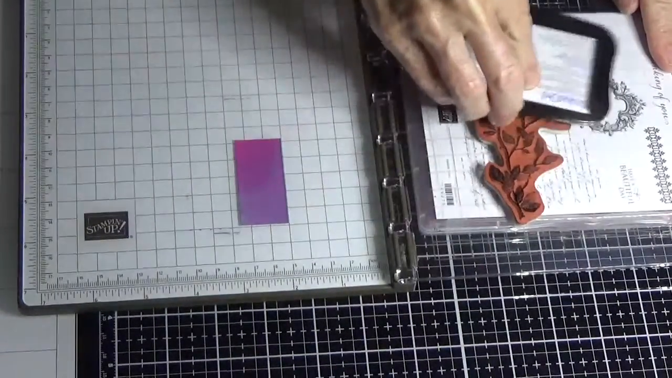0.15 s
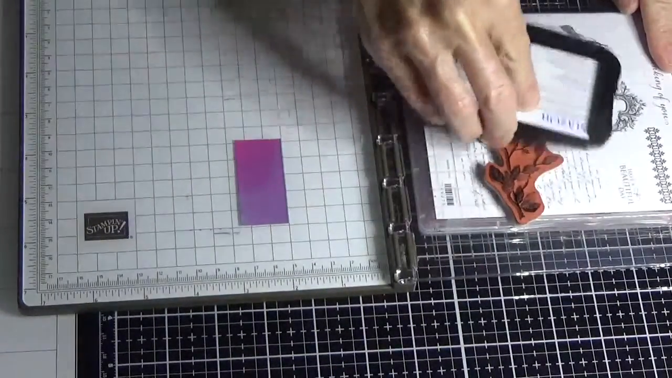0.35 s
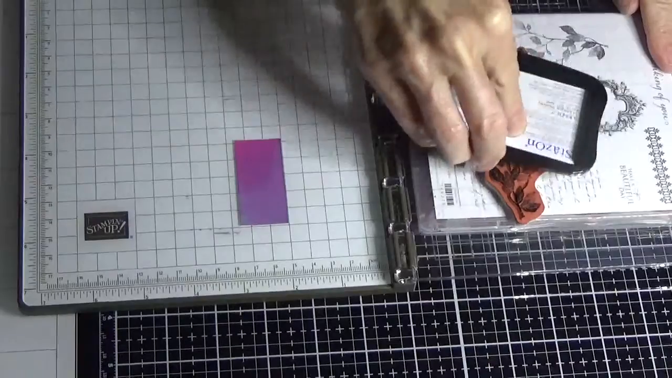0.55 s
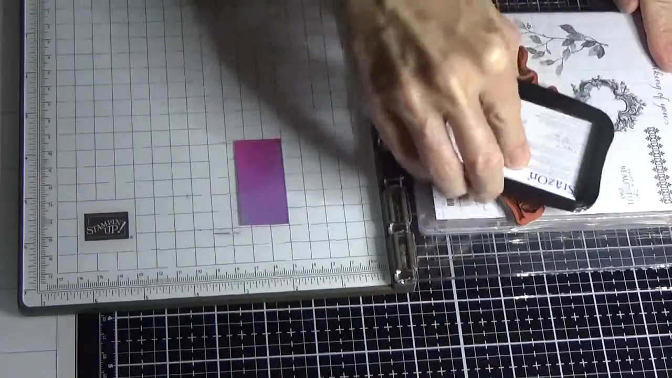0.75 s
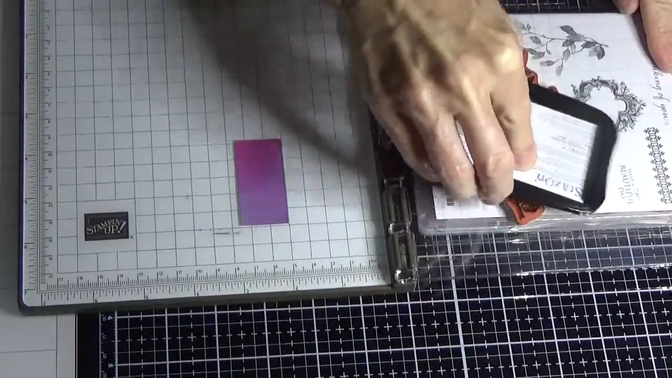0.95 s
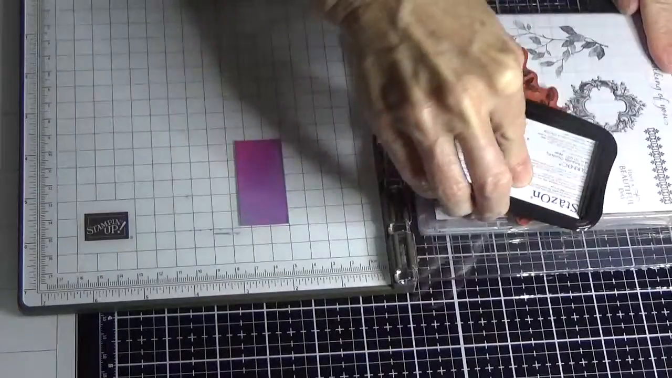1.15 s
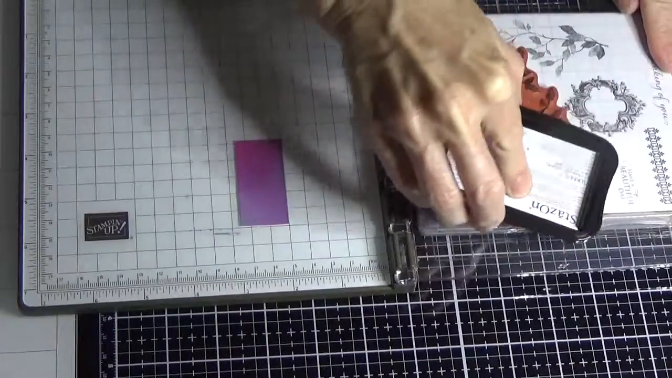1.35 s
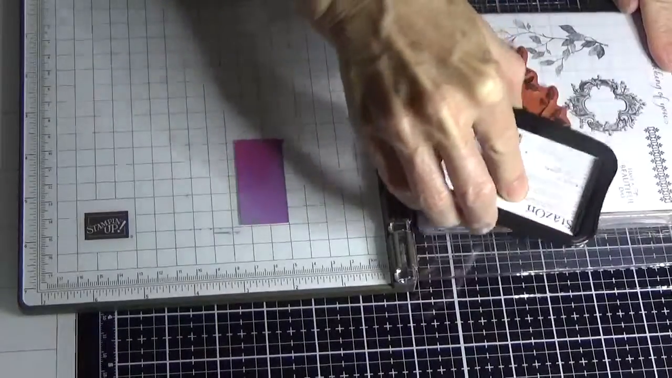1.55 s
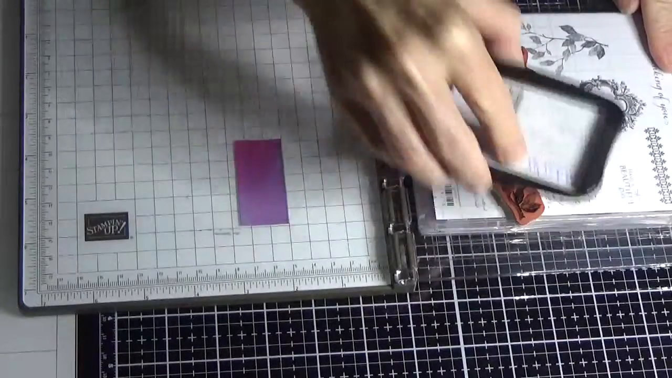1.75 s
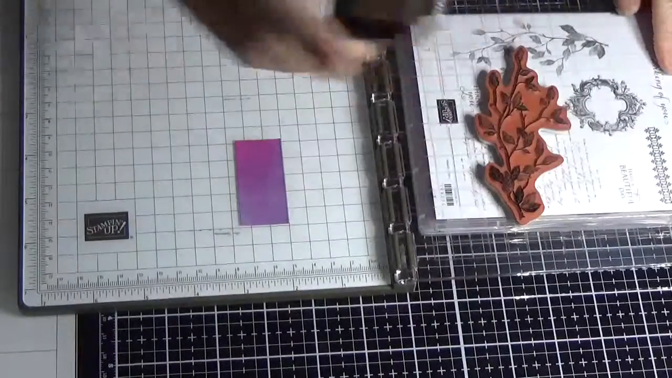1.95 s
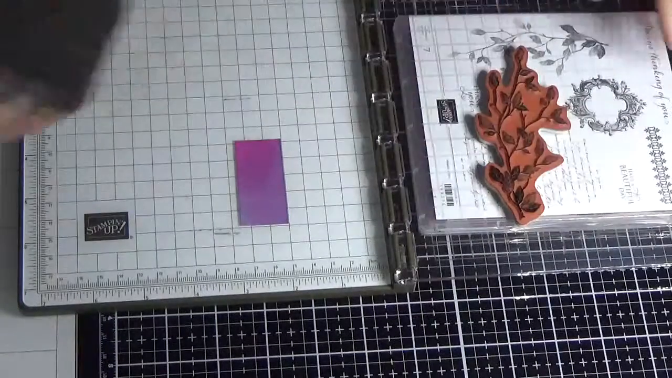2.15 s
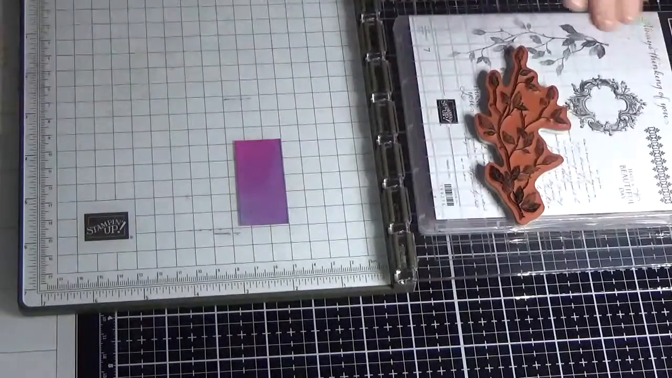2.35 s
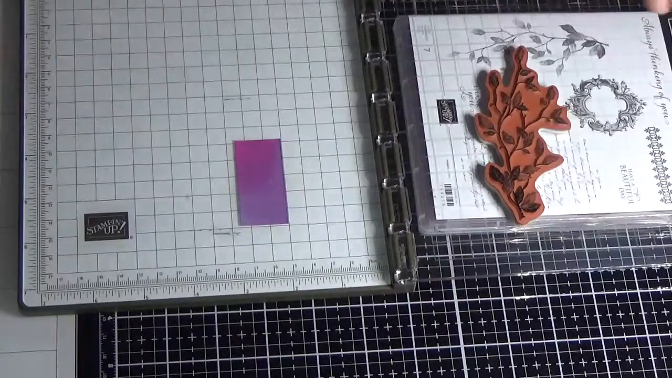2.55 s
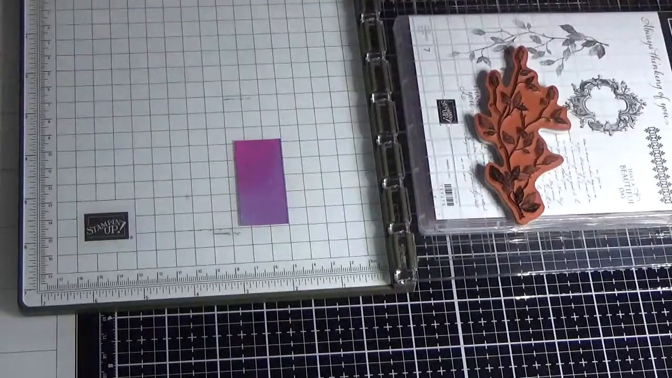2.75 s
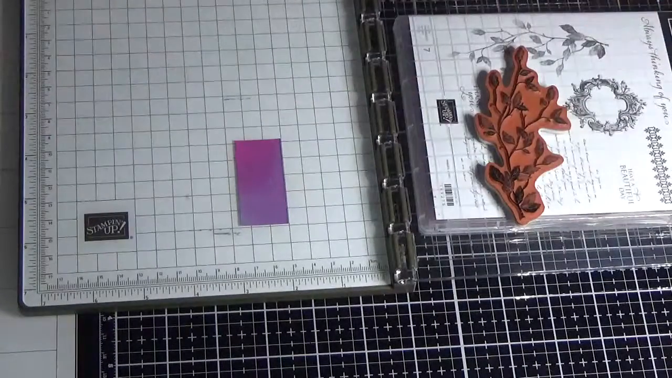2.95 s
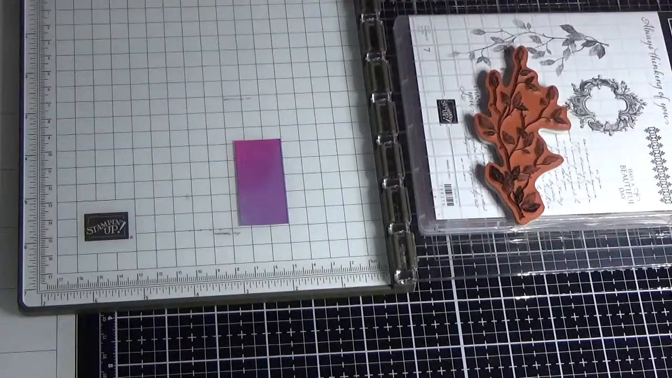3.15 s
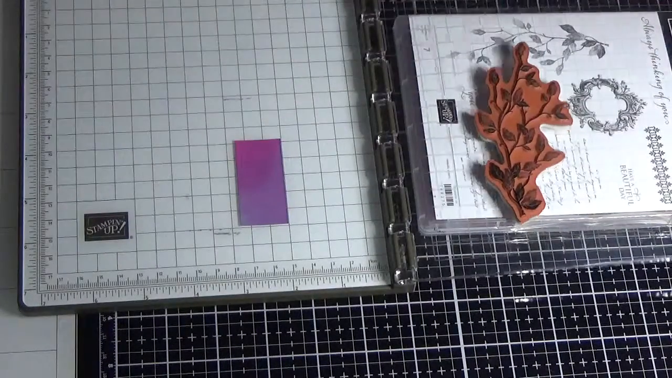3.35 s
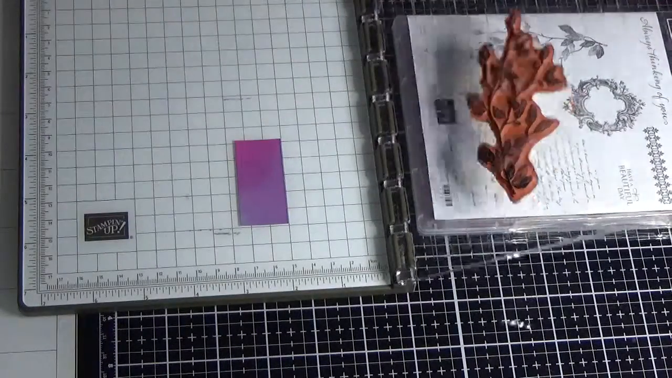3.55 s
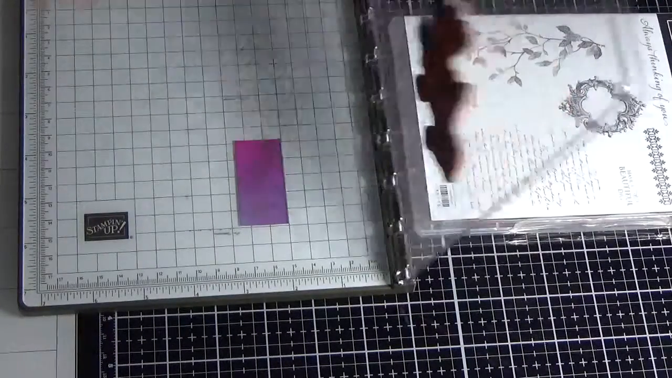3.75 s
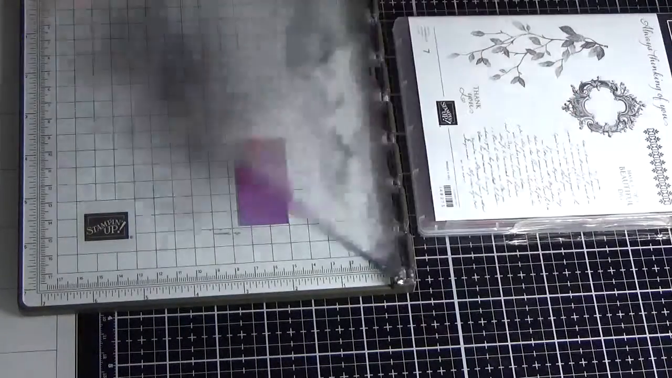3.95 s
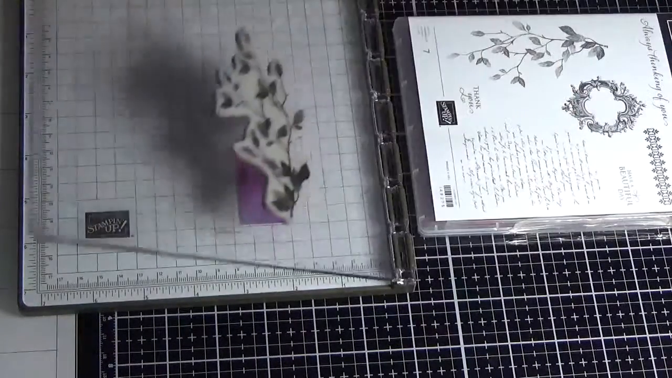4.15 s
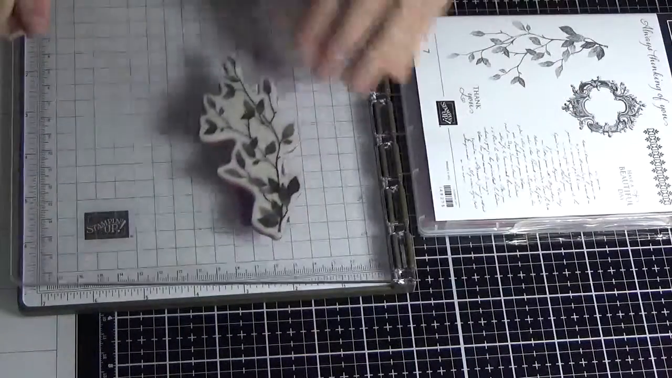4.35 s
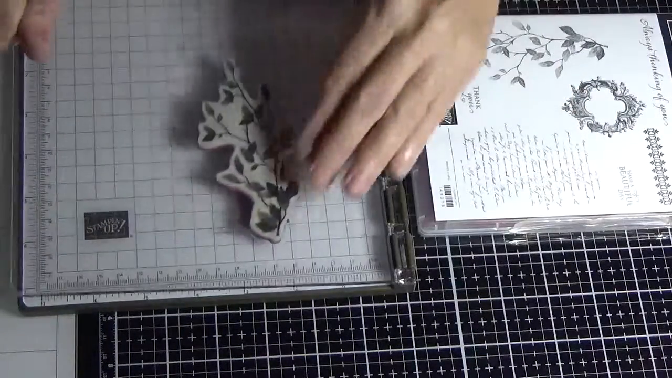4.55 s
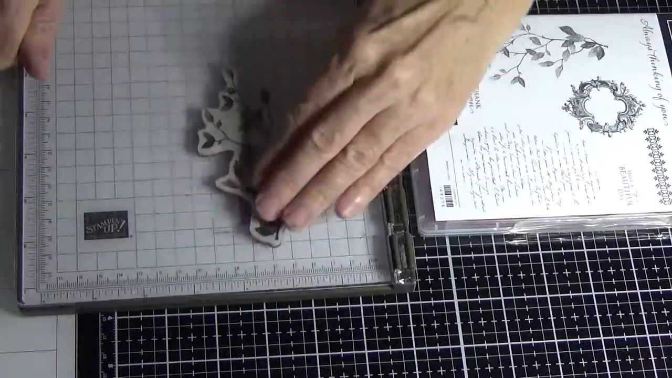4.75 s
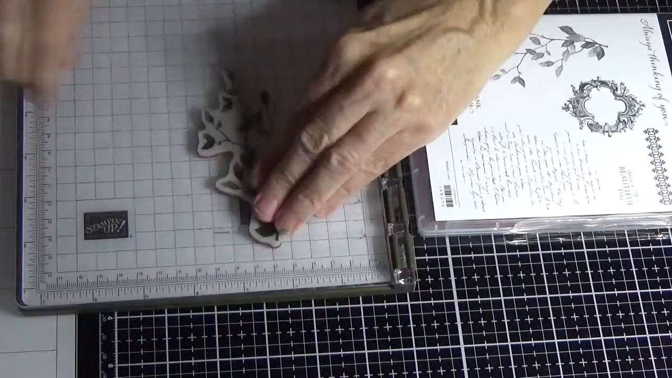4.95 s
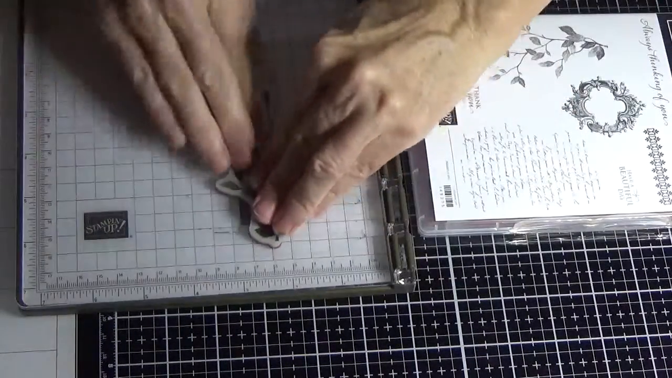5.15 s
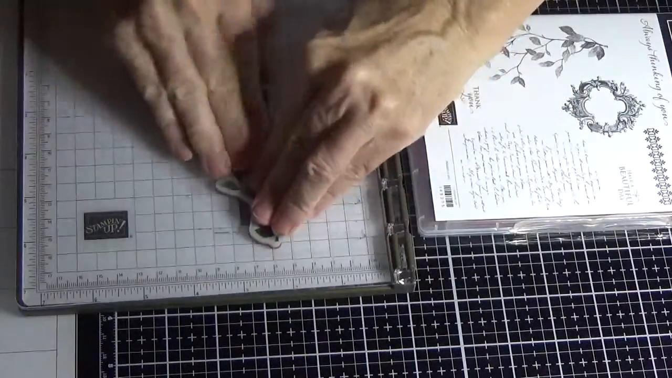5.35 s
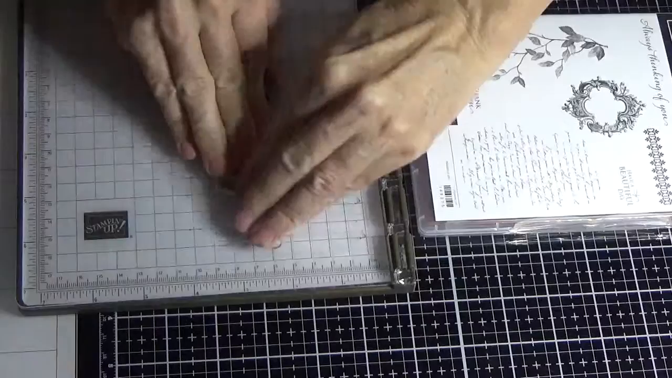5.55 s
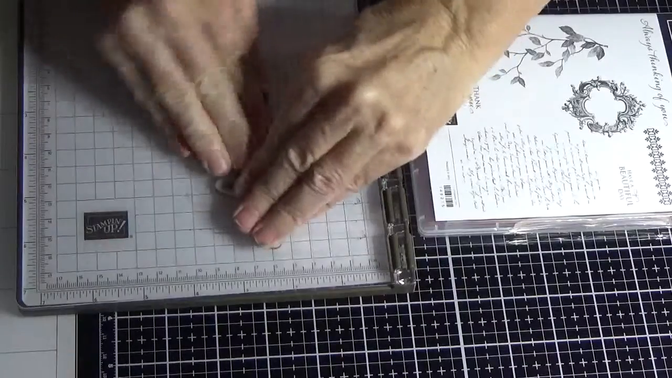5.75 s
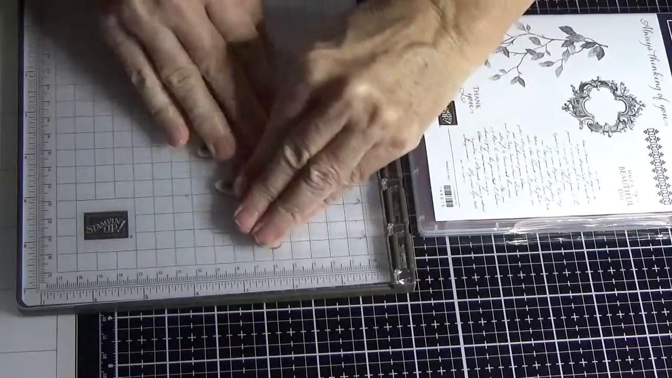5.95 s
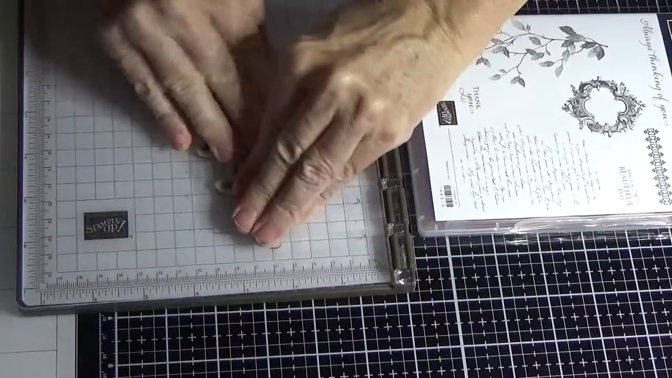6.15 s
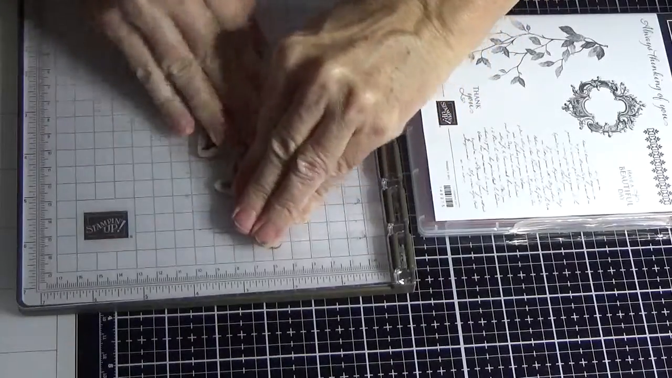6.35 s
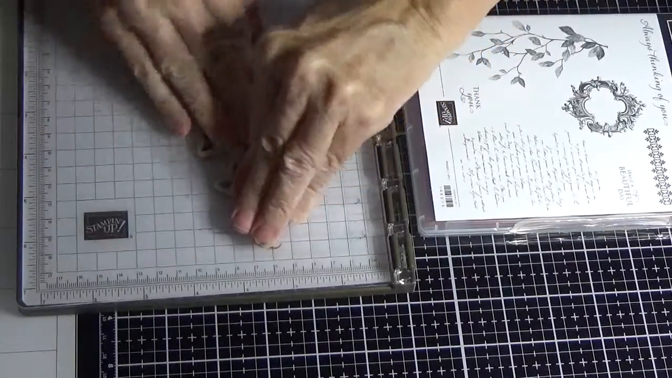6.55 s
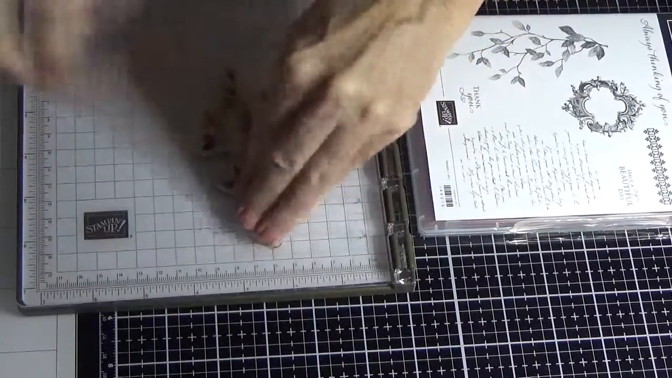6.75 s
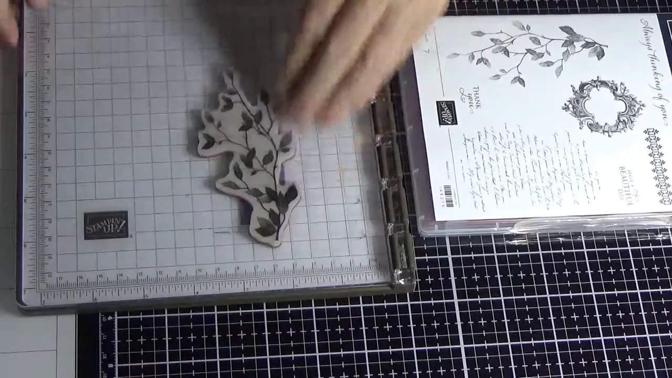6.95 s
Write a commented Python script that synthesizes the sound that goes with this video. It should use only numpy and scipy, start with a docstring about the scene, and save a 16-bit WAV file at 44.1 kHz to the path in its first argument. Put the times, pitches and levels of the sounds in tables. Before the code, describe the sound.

A quick, steady run of soft thuds opens as an ink pad pats a rubber stamp on a desk. Next comes a sharp plastic clatter, ending in the loudest sound, the snap of the pad's lid. Irregular knocks and tacky ticks follow from an acrylic plate being closed and pressed by fingers. The stereo microphone is close, the room small, with a faint hiss throughout.

```python
"""Inking a stamp at a desk

A small room, a stereo microphone close to the desk. An ink pad is tapped again and again on a rubber
stamp lying on a stamping platform. The pad is set aside; its plastic lid clatters on with a loud snap
that washes through the room. The platform's hinged acrylic plate is swung over and pressed, knocking and
ticking under the fingers. Each blow also thuds through the desk. The recorder hisses and ticks faintly."""
import sys
import numpy as np
from scipy import signal
from scipy.fft import rfft, irfft
from scipy.io import wavfile

SR = 44100
rng = np.random.default_rng(int(sys.argv[2]) if len(sys.argv) > 2 else 0)


def master_out(mix):
    """Clip the mix to full scale and print it as 16-bit PCM to the path in sys.argv[1]."""
    frames = np.transpose(np.atleast_2d(mix))
    ceiling = np.clip(frames, -1, 1)
    pcm = np.round(ceiling * 32767).astype(np.int16)
    wavfile.write(sys.argv[1], SR, pcm)


N = 308126
SIZE = 2 ** 15   # samples in one event or room tail
AGE = np.arange(SIZE) / SR
CUTOFF_HZ = 11120   # top of the recorder's range


def amp(db):
    """Decibels to gain."""
    return 10 ** (np.asarray(db) / 20)


def coloured(x, spectrum):
    """Causal (minimum-phase) filter through points of f/Hz, level/dB on a log-frequency axis."""
    hz, db = np.transpose(spectrum)
    log_bins = np.log(np.maximum(np.fft.rfftfreq(SIZE, 1 / SR), 1))
    cepstrum = irfft(np.log(amp(np.interp(log_bins, np.log(hz), db))))
    folded = np.r_[cepstrum[0], 2 * cepstrum[1:SIZE // 2]]
    return signal.fftconvolve(x, irfft(np.exp(rfft(folded, SIZE))))[:len(x)]


def butter(x, hz, kind, order=2):
    """Butterworth filter."""
    sections = signal.butter(order, np.minimum(hz, SR / 2 - 1), kind, fs=SR, output="sos")
    return signal.sosfilt(sections, x + 1e-18)


def resonance(x, hz, t60):
    """One mode, gain 1 at its peak, falling 60 dB in t60 seconds."""
    radius = 1000 ** (-1 / (t60 * SR))
    feedback = [1, -2 * radius * np.cos(2 * np.pi * hz / SR), radius ** 2]
    return signal.lfilter(np.array([1, 0, -1]) * (1 - radius ** 2) / 2, feedback, x + 1e-18)


def dying(t60):
    """Envelope of unit energy that falls 60 dB in t60 seconds."""
    shape = np.exp(-np.log(1000) * AGE / t60)
    return shape / np.linalg.norm(shape)


def click(blur_db, blur_t60):
    """An impulse followed by the blur of many crowded, short-lived modes; about unit energy."""
    blur = amp(blur_db) * dying(blur_t60) * rng.standard_normal(SIZE)
    return (signal.unit_impulse(SIZE) + blur) / np.hypot(1, amp(blur_db))


def add(track, s, sound):
    """Lay a sound into a track at s seconds."""
    start = round(s * SR)
    first, last = max(start, 0), min(start + len(sound), N)
    track[first:last] += sound[first - start:last - start]


def stereo(mid, side):
    """Left and right from mid and side."""
    return np.array([mid + side, mid - side])


# Decay of the small room: f/Hz, t60/s
ROOM_DECAY = [(100, 0.35), (500, 0.41), (1000, 0.35), (2500, 0.32), (5000, 0.32), (11000, 0.27)]
def room_tail(build_s):
    """Diffuse reflections build up, then die band by band; the deep bass hardly reverberates."""
    log_bins = np.log(np.fft.rfftfreq(SIZE, 1 / SR) + 1)
    noise = rfft(rng.standard_normal(SIZE))
    centres = np.log([hz for hz, t60 in ROOM_DECAY])
    bands = [irfft(noise * np.interp(log_bins, centres, share)) for share in np.eye(len(centres))]
    tail = sum(band * dying(t60) for band, (hz, t60) in zip(bands, ROOM_DECAY))
    return butter(tail * (1 - np.exp(-(AGE / build_s) ** 2)), 92, "high")


# Colour of the room's side signal at the microphone: f/Hz, level/dB
ROOM_SIDE = [(60, -29), (110, -41), (190, -35), (350, -13.5), (620, -12.5), (1120, -8.5), (2000, -8),
             (3600, -9), (6460, -6.5), (11600, -11)]
def at_microphone(x, room_db, pan_db, build_s):
    """Direct sound (positive pan is left) plus the room, which widens towards the treble."""
    tail = stereo(room_tail(build_s), amp(2) * coloured(room_tail(build_s), ROOM_SIDE))
    direct = x * amp([[pan_db / 2], [-pan_db / 2]])
    return direct + amp(room_db) * signal.fftconvolve(x[None], tail, axes=1)[:, :N]


# Colour of the room's rumble and the recorder's hiss: f/Hz, level/dB
HISS_COLOUR = [(15, -6), (25, -0.5), (48, 5), (87, 1), (124, 2), (160, 2), (192, -1.5), (372, -4),
               (480, -5.5), (668, -4.5), (1260, -8.5), (1590, -6.5), (1710, -8), (3500, -12),
               (11000, -17.5), (14300, -125), (22000, -120)]
# Their stereo width, side against mid: f/Hz, level/dB
HISS_SIDE = [(60, -26), (110, -15.5), (190, -10), (350, -3), (620, -2.5), (1120, 0), (2000, -1.5),
             (3600, -5), (6460, -7.5), (11600, -10)]
# Faint machine whine in the room: f/Hz, level/dB
WHINE_TONES = [(1416, -80), (1545, -78.5), (3424, -82)]
def background(hiss_db=-62.5, first_tick_s=0.0305, tick_period_s=0.08):
    """Room rumble and hiss, a thin whine, and the recorder's faint regular tick."""
    mid, side = (coloured(rng.standard_normal(N), HISS_COLOUR) for _ in range(2))
    mid_rms = butter(mid, CUTOFF_HZ, "low", order=8).std()
    hiss = amp(hiss_db) * stereo(mid, coloured(side, HISS_SIDE)) / mid_rms
    tones = [resonance(rng.standard_normal(N), hz, t60=0.33) for hz, db in WHINE_TONES]
    whine = sum(amp(db) * tone / tone.std() for tone, (hz, db) in zip(tones, WHINE_TONES))
    pulses = np.zeros(N)
    pulses[round(first_tick_s * SR)::round(tick_period_s * SR)] = amp(-26)
    return hiss + whine + butter(pulses, [3200, 3750], "band")


# Fingers and hinge rubbing, just right of centre: middle t/s, length/s, level/dB, f/Hz
RUB_STROKES = [(2.049, 0.1, -64.5, 8700), (2.373, 0.16, -67, 8800), (2.901, 0.28, -64.5, 8260),
               (3.52, 0.09, -57, 810), (3.961, 0.12, -61.5, 990), (4.242, 0.17, -63.5, 850),
               (6.347, 0.17, -62, 660), (6.51, 0.1, -55.5, 730), (6.757, 0.17, -62, 610),
               (6.915, 0.086, -58, 780)]
def rubs(band_ratio=1.59, grain_db=3, crackles_per_s=160, crackle_db=14):
    """Grainy friction swells and fades with each stroke, with a crackle of sticking and letting go."""
    out = np.zeros(N)
    for s, length, db, hz in RUB_STROKES:
        stroke = np.hanning(int(length * SR))
        noise = rng.standard_normal(SIZE)
        grain = amp(grain_db * np.repeat(rng.standard_normal(SIZE // 128), 128))
        friction = butter(noise * grain, [hz / band_ratio, hz * band_ratio], "band")
        snaps = (rng.random(SIZE) < crackles_per_s / SR) * rng.standard_normal(SIZE)
        crackle = signal.fftconvolve(snaps, click(blur_db=9, blur_t60=0.011))[:SIZE]
        sound = friction / friction.std() + amp(crackle_db) * butter(crackle, 2200, "high")
        add(out, s - length / 2, amp(db) * stroke * sound[:len(stroke)])
    return at_microphone(out, room_db=-3.5, pan_db=-1.5, build_s=0.014)


# Small snaps at the platform, near centre: t/s, level/dB, f/Hz
TACKY_SNAPS = [(1.75, -26, 6600), (4.668, -27, 7660), (4.86, -15, 3070), (4.916, -16, 2520),
               (5.348, -11, 3780), (6.832, -13.5, 2900)]
def ticks(band_ratio=1.143):
    """Tacky rubber and plastic let go; each snap rings for an instant around one pitch."""
    out = np.zeros(N)
    for s, db, hz in TACKY_SNAPS:
        snap = click(blur_db=-8, blur_t60=0.063)
        add(out, s, amp(db) * butter(snap, [hz / band_ratio, hz * band_ratio], "band", order=1))
    return at_microphone(out, room_db=-4, pan_db=0.5, build_s=0.0011)


# Modes of the desk with the platform on it: f/Hz, t60/s, level/dB
DESK_RING = [(61.2, 0.11, 12.5), (132.5, 0.081, 10.5), (194, 0.071, 10.5), (242.7, 0.11, 4.5),
             (319.8, 0.11, 4.5), (446, 0.13, 10.5), (570, 0.14, 8), (704, 0.065, 14), (1131, 0.12, 6)]
# Colour of the desk's crowded modes: f/Hz, level/dB
THUD_COLOUR = [(30, -25), (60, -9), (150, 6), (280, 4), (600, 7.5), (1200, -3.5), (4000, -20), (11000, -34)]
def thud(contact_hz, swell_lag_s=0.00598):
    """A soft push thuds through the desk; its deep notes swell up a moment after the push."""
    push = butter(signal.unit_impulse(SIZE), contact_hz, "low")
    late_push = np.interp(AGE - swell_lag_s, AGE, push, left=0)
    swell = sum(amp(db + rng.normal()) * resonance(resonance(late_push, hz, t60), hz, t60)
                for hz, t60, db in DESK_RING)
    blur = butter(click(blur_db=3, blur_t60=0.15), contact_hz, "low")
    return swell + coloured(blur, THUD_COLOUR)


def desk_pushes(hits, push_db, push_hz, delay_s=0.004, mid_body_hz=250, loss_db_per_octave=5.5):
    """A blow pushes the desk less the nearer it falls to a stiff edge (the higher its lowest note)."""
    return [(s + delay_s, db + push_db - loss_db_per_octave * np.log2(lowest_hz / mid_body_hz), push_hz)
            for s, db, _, lowest_hz in hits]


# Soft bumps of hand and plate, heard through the desk: t/s, level/dB, contact f/Hz
SOFT_BUMPS = [(1.753, -11, 117), (3.799, -11.5, 149), (3.957, -5, 155), (5.152, -6, 80), (5.916, -7.5, 100),
              (6.8, -15.5, 169)]
def desk(push_hz=330, after_snap_s=0.015, after_snap_db=-18.5):
    """The desk thuds under soft bumps, under blows on lid and plate, and after the lid's loud snap."""
    after_snap = [(s + after_snap_s, db + after_snap_db, push_hz) for s, db, _ in LID_SNAP_WASH]
    from_lid = desk_pushes(LID_BLOWS, push_db=-21.5, push_hz=push_hz)
    from_plate = desk_pushes(PLATE_KNOCKS, push_db=-10.5, push_hz=push_hz)
    out = np.zeros(N)
    for s, db, contact_hz in SOFT_BUMPS + after_snap + from_lid + from_plate:
        add(out, s, amp(db) * thud(contact_hz))
    return at_microphone(butter(out, 46, "high"), room_db=0.5, pan_db=0.6, build_s=0.011)


def ringing(x, modes, detune=0.0042):
    """A body's clear modes; the grip shifts their pitches and strengths a little from blow to blow."""
    return sum((-1) ** k * amp(db + rng.normal()) * resonance(x, hz * (1 + detune * rng.normal()), t60)
               for k, (hz, t60, db) in enumerate(modes))


def dispersed(x, lag_s, knee_hz=3080):
    """Bending waves travel faster the higher they are, so the low notes arrive up to lag_s late."""
    hz = np.fft.rfftfreq(2 * SIZE, 1 / SR)
    phase = 2 * np.pi * lag_s * knee_hz * np.arctan(hz / knee_hz)
    return irfft(rfft(x, 2 * SIZE) * np.exp(-1j * phase))[:SIZE]


def blows(hits, colour, modes, blur_db, blur_t60, ring_db, lag_s):
    """Struck plastic cracks and rings, duller when the contact is soft, thinner near a stiff edge."""
    out = np.zeros(N)
    for s, db, contact_hz, lowest_hz in hits:
        crack = coloured(click(blur_db, blur_t60), colour)
        ring = amp(ring_db) * ringing(signal.unit_impulse(SIZE), modes)
        dulled = butter(crack + ring, contact_hz, "low", order=3)
        thinned = butter(dulled, lowest_hz, "high")
        add(out, s, amp(db) * dispersed(thinned, lag_s))
    return out


# Knocks of the plate, just left of centre: t/s, level/dB, contact f/Hz, lowest stirred f/Hz
PLATE_KNOCKS = [(3.322, 2.5, 1350, 850), (3.4524, -9, 1200, 494), (3.494, -3, 1130, 686),
                (4.5805, -4, 960, 470), (4.798, -11.5, 1050, 494), (4.8355, -2, 1300, 310),
                (5.015, 9, 2000, 720), (5.8345, 14.5, 2740, 1160), (6.39, 0.5, 3200, 243)]
# Colour of the acrylic's crack: f/Hz, level/dB
PLATE_COLOUR = [(100, -31), (350, 4), (550, -23), (1050, 0), (1350, -8), (1900, -14.5), (3000, -7),
                (4800, -2.5), (6500, -1), (11000, 0.5)]
# Modes of the plate: f/Hz, t60/s, level/dB
PLATE_RING = [(613, 0.083, 2.5), (701, 0.092, 3.5), (1045, 0.11, 1), (1740, 0.031, -2.5),
              (2370, 0.018, -7.5), (2610, 0.031, -2), (3050, 0.11, -8), (910, 0.057, -28), (1980, 0.02, -5)]
def plate():
    """The acrylic plate knocks on its hinge and base as it is swung over and pressed."""
    knocks = blows(PLATE_KNOCKS, PLATE_COLOUR, PLATE_RING,
                   blur_db=5, blur_t60=0.035, ring_db=1.5, lag_s=0.001235)
    return at_microphone(knocks, room_db=-6.5, pan_db=1, build_s=0.0051)


# Blows on the pad's case and lid, a little left: t/s, level/dB, contact f/Hz, lowest stirred f/Hz
LID_BLOWS = [(2.5635, 19.5, 7470, 330), (2.5725, 10.5, 6000, 503), (2.6345, 12.5, 9300, 395),
             (2.916, 5, 2400, 198), (3.0595, 7.5, 3600, 780), (3.0652, 7, 7000, 1010),
             (3.1028, 22, 9060, 1890), (3.1135, 14, 9500, 2570)]
# Colour of their crack: f/Hz, level/dB
LID_COLOUR = [(100, -27), (400, -21.5), (800, -10.5), (1200, -16.5), (1800, -5.5), (2500, -4), (3300, -8.5),
              (4300, -12.5), (6500, -20), (8300, -13.5), (11000, -15.5)]
# Modes of case and lid: f/Hz, t60/s, level/dB
LID_RING = [(761, 0.34, 4.5), (1028, 0.2, -5), (1434, 0.12, -9), (1746, .16, -4), (2260, 0.068, -8),
            (2435, 0.12, 3.5), (2566, 0.051, -2), (3215, 0.12, 3), (3270, 0.022, -2.5), (4300, 0.13, -22),
            (4970, 0.12, -5)]
def lid():
    """The plastic case is put down and the lid drops on it."""
    clatter = blows(LID_BLOWS, LID_COLOUR, LID_RING, blur_db=3, blur_t60=0.04, ring_db=-2, lag_s=0.001)
    return at_microphone(clatter, room_db=-3.5, pan_db=2, build_s=0.00083)


# The room's wash around the microphone after the lid's loud snap: t/s, level/dB, t60/s
LID_SNAP_WASH = [(3.113, 19, 0.28)]
# Colour of the wash: f/Hz, level/dB
WASH_COLOUR = [(100, -45), (500, -17.5), (900, -12), (1400, -4), (2100, 1.5), (3100, -1.5), (4000, -9),
               (5200, 0), (6600, -13.5), (8100, -5), (11000, -13.5)]
def snap_wash(reflections_per_s=9000, ring_db=-15):
    """A bright, dense wash of room reverberation dies away after the lid's loud snap."""
    out = np.zeros(N)
    chance = reflections_per_s / SR
    for s, db, t60 in LID_SNAP_WASH:
        arrivals = (rng.random(SIZE) < chance) * rng.choice([-1, 1], SIZE)
        reflections = arrivals * dying(t60) / np.sqrt(chance)
        wash = coloured(reflections, WASH_COLOUR) + amp(ring_db) * ringing(reflections, LID_RING)
        add(out, s, amp(db) * wash)
    return at_microphone(out, room_db=-0.5, pan_db=1.2, build_s=0.0032)


# Pad on stamp, close in front of the microphone: t/s, thud level/dB, contact f/Hz
PAD_TAPS = [(-.012, -4.5, 210), (0.1808, -2.5, 470), (0.4465, 9, 397), (0.7316, 10.5, 219),
            (1.0523, 4.5, 262), (1.321, 4.5, 215), (1.544, 6.5, 192)]
# Colour of the case's clack: f/Hz, level/dB
CLACK_COLOUR = [(100, -46), (400, -3.5), (700, -1), (900, -5.5), (1250, 1.5), (2000, -5.5), (3000, -5),
                (5000, -10), (11000, -6)]
def pad_on_stamp(usual_contact_hz=219, clack_hz=2260, clack_delay_s=0.0055):
    """The pad's foam meets the rubber with a thud, then its case lands flat with a clack."""
    out = np.zeros(N)
    for s, thud_db, contact_hz in PAD_TAPS:
        add(out, s, amp(thud_db) * thud(contact_hz))
        # The harder and firmer the tap, the louder, sooner and brighter the clack.
        firmness_octaves = np.log2(contact_hz / usual_contact_hz)
        strength = amp(-6 + 0.87 * thud_db + 4.5 * firmness_octaves)
        delay_s = clack_delay_s / strength ** 0.41
        top_hz = clack_hz * strength ** 0.43
        clack = coloured(click(blur_db=45, blur_t60=0.075), CLACK_COLOUR)
        add(out, s + delay_s, strength * butter(clack, top_hz, "low"))
    return at_microphone(out, room_db=-6.5, pan_db=-0.3, build_s=0.012)


def scene():
    """Everything on the desk as it reaches the microphone, over the background."""
    return pad_on_stamp() + desk() + lid() + snap_wash() + plate() + ticks() + rubs() + background()


def record(dry):
    """The recorder rounds the highest peaks and cuts the top steeply."""
    lowpass = signal.ellip(12, 0.1, 80, CUTOFF_HZ, fs=SR, output="sos")
    return signal.sosfilt(lowpass, np.tanh(dry))


dry = scene()
out = record(dry)
master_out(out)
```